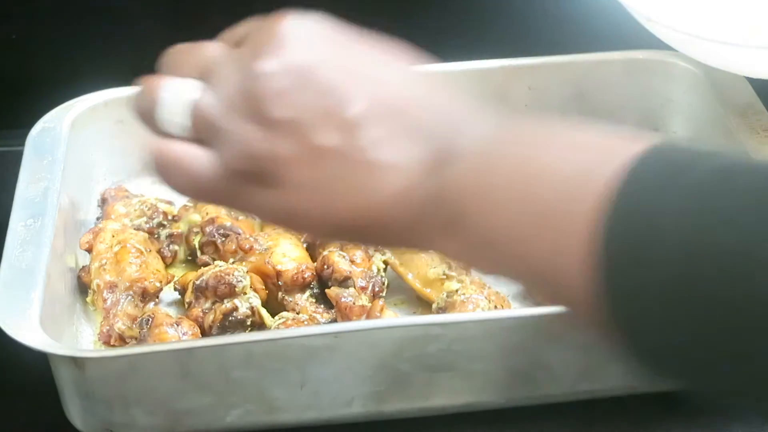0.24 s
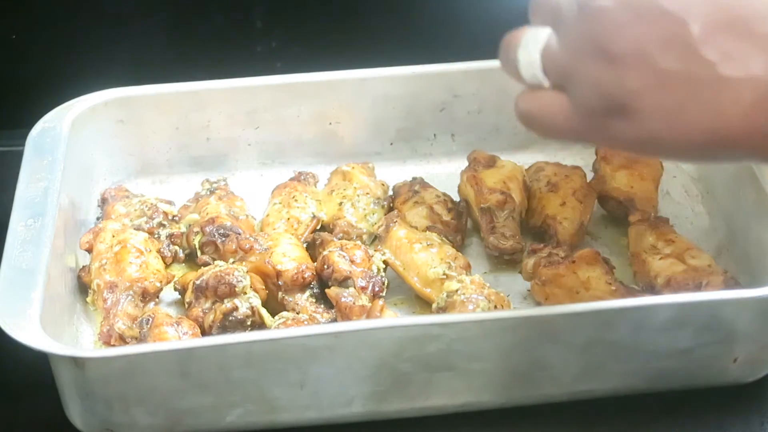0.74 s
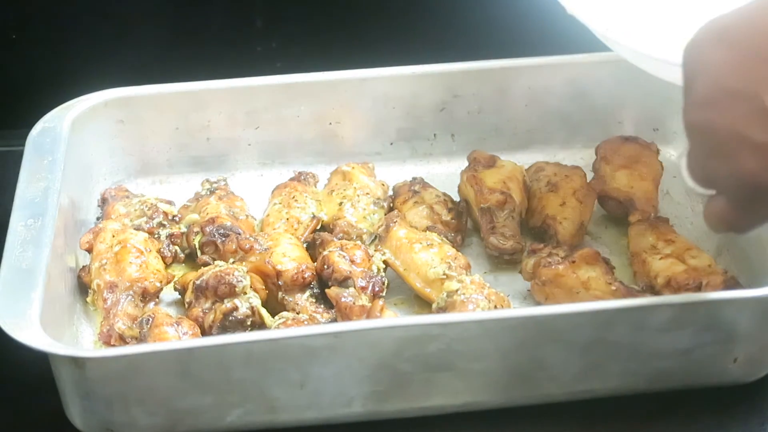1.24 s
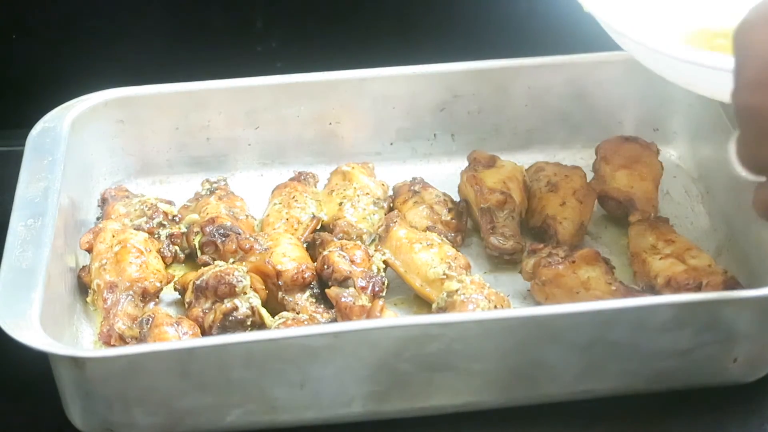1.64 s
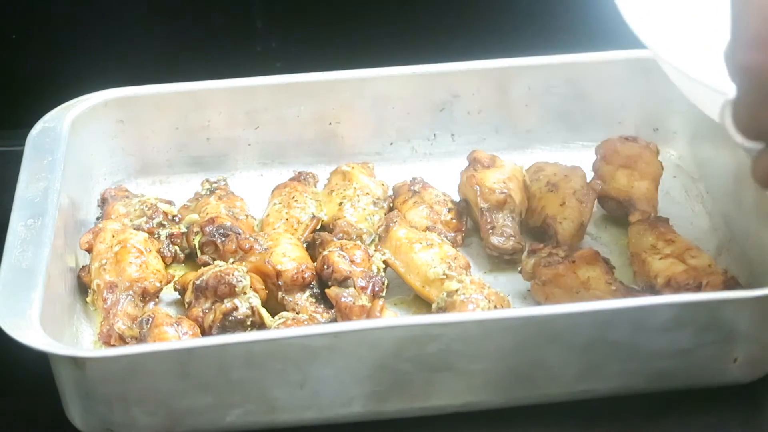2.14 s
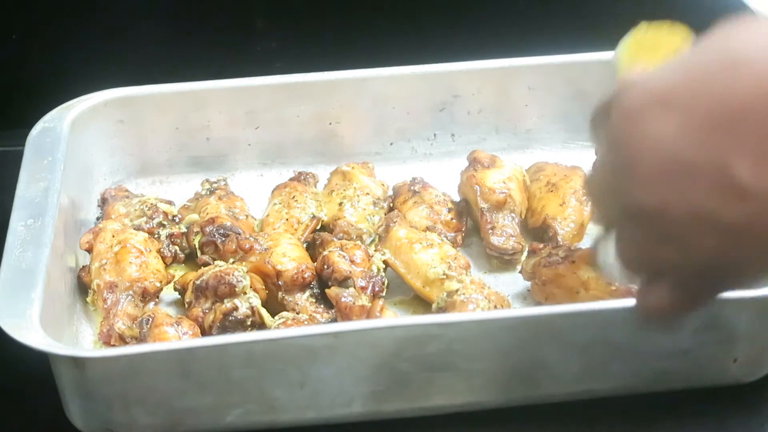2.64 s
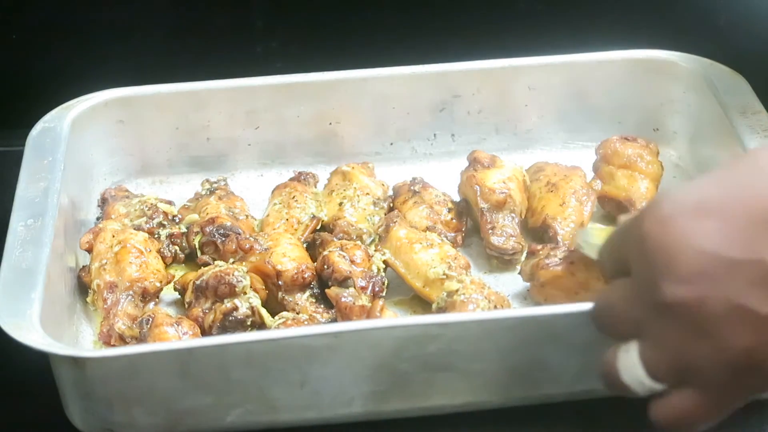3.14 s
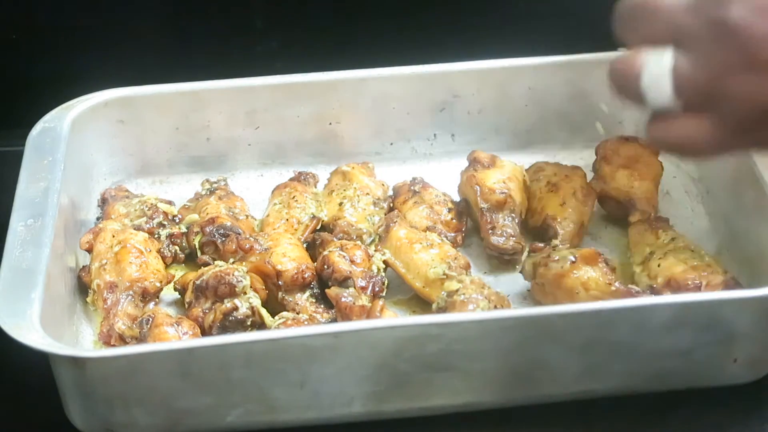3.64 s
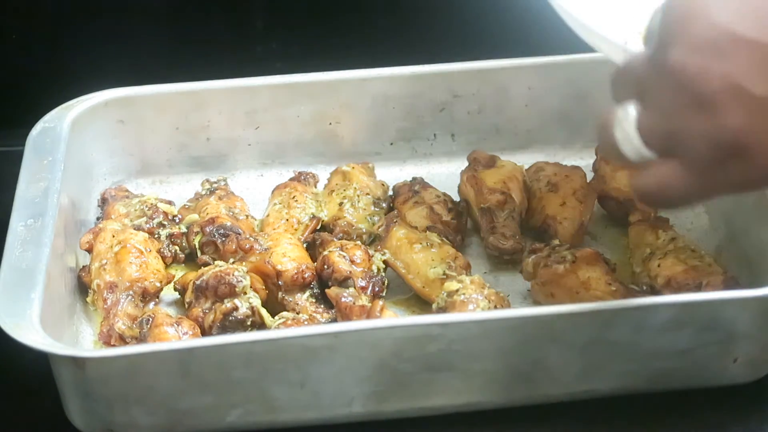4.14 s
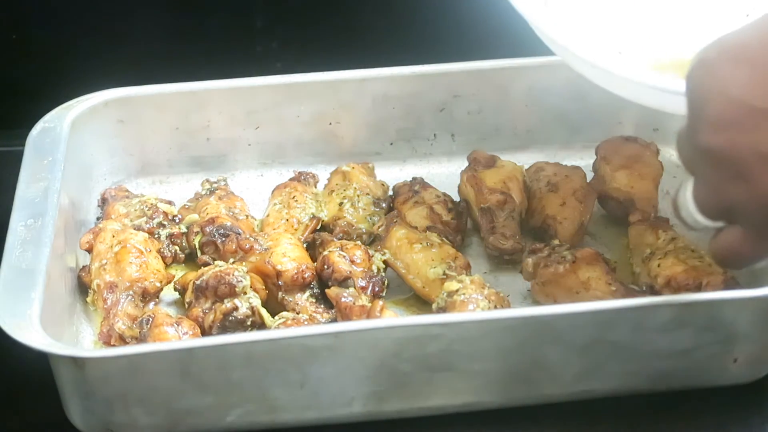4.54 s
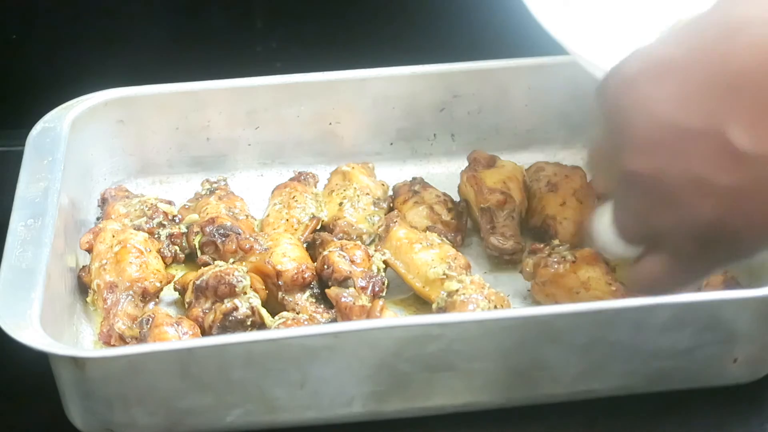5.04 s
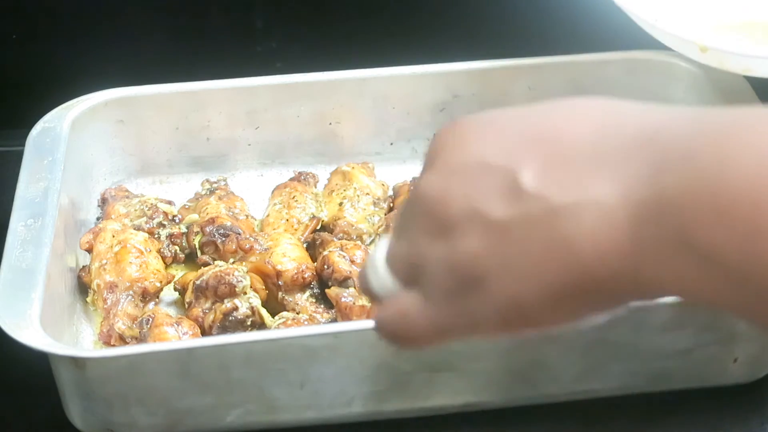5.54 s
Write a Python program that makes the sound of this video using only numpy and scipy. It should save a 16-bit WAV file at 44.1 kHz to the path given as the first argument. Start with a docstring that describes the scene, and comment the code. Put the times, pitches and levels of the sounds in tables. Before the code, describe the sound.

A metal spoon clinks sharply in a sauce bowl, scrapes softly, later strikes a roasting pan once, over a steady low appliance hum.

```python
"""A steel spoon knocks and chatters in a sauce bowl, scoops softly, and once strikes the rim of a roasting pan.
Bowl and pan are damped modes plus a noise crack; scrapes and judder are swarms of clicks; ticks are noise.
The worktop thuds in decaying sines as things shift on it, and a small hard kitchen answers in noise echoes.
Behind it, appliances hum at twice the mains rate with a slow throb, a small motor whines faintly, air moves."""
import sys
import numpy as np
from scipy import signal
from scipy.fft import rfft, irfft, next_fast_len
from scipy.io import wavfile
from scipy.ndimage import map_coordinates

SR = 44100
rng = np.random.default_rng(int(sys.argv[2]) if len(sys.argv) > 2 else 0)


def dump(signal):
    """Clip the signal to [-1, 1] and save it as 16-bit WAV at the path in sys.argv[1]."""
    limited = np.clip(np.atleast_2d(signal).T, -1, 1)
    pcm = np.round(limited * 32767).astype(np.int16)
    wavfile.write(sys.argv[1], SR, pcm)


N = 255780

# the one blow of the spoon on the pan: t/s, level/dB
PAN_BLOW = (5.518, -2.2)


def amp(db):
    """Decibels to gain."""
    return 10 ** (np.asarray(db) / 20)


def unit(x):
    """Scale to rms 1."""
    return x / np.sqrt(np.mean(x ** 2) + 1e-20)


def seconds(size):
    """A time axis in seconds."""
    return np.arange(size) / SR


def fade(t, t60):
    """Exponential decay by 60 dB in t60 seconds."""
    return np.exp(-np.log(1000) * t / t60)


def onset(t, rise):
    """A soft attack with a time constant of rise seconds."""
    return 1 - np.exp(-t / rise)


def along(points, hz):
    """(Hz, value) points read on a log frequency axis."""
    f, v = np.transpose(points)
    return np.interp(np.log(hz + 1), np.log(f), v)


def filtered(x, response):
    """x shaped by a gain that depends on frequency."""
    size = x.shape[-1]
    padded = next_fast_len(size + 8192)
    spectrum = rfft(x, padded) * response(np.fft.rfftfreq(padded, 1 / SR))
    return irfft(spectrum, padded)[..., :size]


def noise(response, size):
    """Coloured noise of rms 1."""
    return unit(filtered(rng.standard_normal(size), response))


def hump(hz, centre, octaves):
    """A broad resonance with gentle skirts."""
    distance = np.log2((hz + 1) / centre) / octaves
    return 1 / (1 + distance ** 2 / 4) ** 4


def wobble(rate):
    """A smooth random curve with rate knots a second."""
    knots = rng.standard_normal(int(N * rate / SR) + 4)
    return map_coordinates(knots, [seconds(N) * rate])


def tone(hz):
    """A sine of rms 1 from a random phase; hz may be a curve."""
    cycles = np.cumsum(hz * np.ones(N)) / SR
    return np.sqrt(2) * np.sin(2 * np.pi * (cycles + rng.random()))


def slips(rate, size, scatter_db=4):
    """A random swarm of tiny clicks, rate of them a second on average, rms 1."""
    strength = amp(rng.normal(0, scatter_db, size))
    polarity = rng.choice([-1, 1], size)
    return unit(strength * polarity * (rng.random(size) < rate / SR))


def stroke(t, length):
    """The rise and fall of one movement of the hand, strongest a third of the way through length."""
    u = 3 * t / length
    return u ** 2 * np.exp(2 * (1 - u))


def add(track, s, sound):
    """Mix a sound into a track from time s on."""
    part = track[..., round(s * SR):][..., :sound.shape[-1]]
    part += sound[..., :part.shape[-1]]


def in_kitchen(sound, near_db, far_db, near_t60=0.18):
    """Direct sound, quick echoes from pan and worktop, then a room tail that decays at its own rate per band."""
    # room decay: f/Hz, t60/s
    room_t60 = [(150, .35), (600, 0.46), (2000, 0.41), (4000, 0.51), (8000, 0.7), (14000, 0.61)]
    # stereo width of the echoes: f/Hz, side minus mid/dB
    echo_width = [(100, -17), (250, -21), (600, -14.5), (1500, -15), (2800, -17.5), (4500, -3), (6500, 0.5),
                  (9000, 8.5), (12000, 2)]
    t = seconds(SR * 3 // 4)
    hz, frames, grains = signal.stft(rng.standard_normal((2, len(t))), SR, nperseg=256)
    decaying = grains * fade(frames, along(room_t60, hz)[:, None])
    far = signal.istft(decaying, SR, nperseg=256)[1][:, :len(t)]
    far = far * onset(t, 0.0097)
    near = rng.standard_normal((2, len(t))) * fade(t, near_t60) * onset(t, 0.0033)
    answer = amp(near_db) * near / np.linalg.norm(near[0]) + amp(far_db) * far / np.linalg.norm(far[0])
    mid, side = signal.fftconvolve(sound[None], answer, axes=1)
    mid[:len(sound)] += sound
    side = filtered(side, lambda hz: amp(along(echo_width, hz)))
    return np.array([mid + side, mid - side])


def ring(modes, t, weight, scatter_db=2.0):
    """Damped modes of a struck body, each a little different in level at every blow."""
    hz, db, t60 = np.transpose(modes)
    size = amp(db) / np.linalg.norm(amp(db)) * weight(hz)
    size = size * amp(rng.normal(0, scatter_db, len(hz)))
    polarity = (-1) ** np.arange(len(hz))
    return (size * polarity) @ (fade(t, t60[:, None]) * np.sin(2 * np.pi * np.outer(hz, t)))


def appliance_hum():
    """A motor slipping against the mains makes the double-mains hum swell and sink over steady low tones."""
    # steady motor tones: f/Hz, level/dB rms
    motor_tones = [(31, -64), (49.57, -49), (59.27, -56), (111.55, -60), (145, -64), (169.6, -64),
                   (240, -69)]
    double_mains_hz, throb_hz = 119.96, 6.19
    throb_depth, throb_peak_s = 0.35, 0.077
    throb = 1 + throb_depth * np.cos(2 * np.pi * throb_hz * (seconds(N) - throb_peak_s))
    hum = amp(-42) * tone(double_mains_hz) * throb
    return hum + sum(amp(db) * tone(hz) for hz, db in motor_tones)


def motor_whine():
    """Thin high tones of a small motor, each wavering in level and pitch on its own."""
    # whine tones: f/Hz, level before wavering/dB rms, pitch wander/Hz
    whine_tones = [(634, -75.5, 6), (1285, -73, 7.7), (1910, -80.5, 13), (2570, -74, 6.4),
                   (3240, -80.5, 3.7), (5100, -84.5, 7), (6438, -91.5, 6), (7084, -81.5, 2)]
    waver_db = 2.05
    whine = np.zeros(N)
    for hz, db, wander in whine_tones:
        level = amp(db + waver_db * wobble(4.4))
        whine += level * tone(hz + wander * wobble(40))
    return whine


def moving_air():
    """Fan air and rumble: steady coloured noise, nearly mono in the deep bass."""
    # colour of the air: f/Hz, level/dB
    air_colour = [(20, -11), (40, 2), (55, 2), (78, -7.5), (95, 4), (130, 3), (170, -3.5), (240, -7),
                  (370, -7), (550, -15), (1500, -22.5), (3300, -28), (7000, -37.5), (12500, -46.5),
                  (15000, -49)]
    # stereo width of the air: f/Hz, side minus mid/dB
    air_width = [(50, -33), (100, -20.5), (160, -4), (240, 1.5), (400, 4), (900, 4), (1500, 2.5), (3000, 0),
                 (12000, 1.5)]
    mid, side = amp(-49) * noise(lambda hz: amp(along(air_colour, hz)), (2, N))
    side = filtered(side, lambda hz: amp(along(air_width, hz)))
    return np.array([mid + side, mid - side])


def crackle():
    """Sparse wet ticks and a faint thin ring of narrow noise while the spoon travels back to the bowl."""
    # the thin ring before the first clink: t/s, level/dB, length/s, f/Hz, width/octaves
    faint_ring = (0.2, -67.5, 0.8, 1886, 0.3)
    ticks_per_s, end_s = 38, 0.8
    out, t = np.zeros((2, N)), seconds(SR)
    clicks = slips(ticks_per_s, len(t), scatter_db=6.5)
    wet = unit(filtered(clicks, lambda hz: hump(hz, centre=3650, octaves=0.39)))
    add(out, 0, in_kitchen(amp(-68) * wet * (t < end_s), near_db=-6, far_db=-24, near_t60=.04))
    s, db, length, centre_hz, octaves = faint_ring
    thin = amp(db) * stroke(t, length) * noise(lambda hz: hump(hz, centre_hz, octaves), len(t))
    add(out, s, in_kitchen(thin, near_db=-.5, far_db=-15.5))
    return out


def contact_sound(place, size, rim_db):
    """One touch of the spoon: the bowl rings briefly, and its rim tone swells just after the contact."""
    # modes of the bowl: f/Hz, level/dB, t60/s
    bowl_modes = [(401, -23.5, 0.2), (566, -7.5, 0.033), (660.7, -1, 0.079), (699.6, -8, .18),
                  (875, -16, 0.12), (1045, -15, 0.095), (1350, -6.5, 0.063), (1427, -14.5, 0.1),
                  (1586, -17.5, 0.035), (1866, -9, 0.08), (1890, -29.5, 0.77), (2360, -14.5, 0.098),
                  (2613, -3, 0.036), (2935, -3, 0.031), (3270, -6.5, 0.026), (3465, -12, 0.07),
                  (3740, -1.5, 0.014), (4470, -18.5, 0.037), (4850, -25.5, 0.0398)]
    # colour of the contact crack: f/Hz, level/dB
    crack_colour = [(100, -47.5), (250, -18), (480, 5.5), (850, -2), (1500, 2), (3000, 5), (4000, -1),
                    (5500, -10.5), (8000, -22), (10000, -23.5), (12000, -21.5), (15000, -33)]
    t, place = seconds(size), np.clip(place, 0, 1)
    # belly blows (place 0) bring out the low modes, those near the rim (1) the bright ones
    body_db = 13 - 22.5 * place
    edge_db = -2.5 + 9.5 * place
    edge_hz, soft_hz = 3700, 3900

    def contact(hz):
        """Tilt by place; sauce softens every contact."""
        tilt_db = body_db / (1 + (hz / 900) ** 6) + edge_db * hump(hz, edge_hz, 0.68)
        return amp(tilt_db) / np.sqrt(1 + (hz / soft_hz) ** 4)

    crack = filtered(noise(lambda hz: amp(along(crack_colour, hz)), len(t)), contact) * fade(t, 0.052)
    blow = (amp(-3) * ring(bowl_modes, t, contact) + amp(-6) * crack) * onset(t, 0.00023)
    # the rim tone grows and climbs in pitch with the place
    rim_hz = 1857 + 160 * place
    rim_peak_s, rim_spread_s = 0.01, 0.0032
    swell = np.exp(-((t - rim_peak_s) / rim_spread_s) ** 2 / 2)
    return blow + amp(rim_db) * place * swell * np.sin(2 * np.pi * rim_hz * t)


def bowl():
    """The spoon knocks on the hand-held bowl, each blow coloured by where it lands."""
    # knocks: t/s, level/dB, place on the wall (0 belly - 1 rim)
    knocks = [(0.8716, -12, .1), (0.8775, -20, .95), (0.8918, -10, 0.39), (0.9065, -22.5, 0.99),
              (0.9474, -6.5, 0.76), (0.9705, -16, 0.38), (1.154, -35, 0.82), (4.044, -40, 0.16),
              (4.0648, -35, 0.94), (4.0915, -5, 0.43), (4.1957, -13.5, 0.89), (4.365, -37, 0.73),
              (4.525, -47, 0.66)]
    out = np.zeros((2, N))
    for s, db, place in knocks:
        knock = amp(db) * contact_sound(place, size=SR * 2 // 5, rim_db=-1)
        add(out, s, in_kitchen(knock, near_db=-7.5, far_db=-15.5))
    return out


def chatter():
    """Quick, uneven touches that tend to grow lighter as the spoon rubs against the bowl after a clink."""
    # chatters: t/s, starting level/dB, length/s
    chatters = [(1.0, -33.5, .36), (4.26, -40, .24)]
    touches_per_s, fall_db_per_s, scatter_db = 50, 54, 4
    out = np.zeros((2, N))
    for s, db, length in chatters:
        touches = np.zeros(SR * 3 // 4)
        for beat in np.arange(0, length, 1 / touches_per_s):
            at = beat + rng.random() / touches_per_s
            strength = amp(db - fall_db_per_s * at + rng.normal(0, scatter_db))
            place = rng.normal(0.75, 0.11)
            # light touches near the rim barely raise its tone
            add(touches, at, strength * contact_sound(place, size=SR // 8, rim_db=-6.5))
        add(out, s, in_kitchen(touches, near_db=-5, far_db=-21.5))
    return out


def scrapes():
    """The spoon drags through sauce and along the sides: swarms of tiny slips under a short stroke."""
    # strokes: t/s, level/dB, length/s, centre f/Hz
    strokes = [(1.015, -44, 0.13, 3230), (1.793, -51, 0.032, 2940), (1.978, -43, 0.026, 1250),
               (2.047, -39.5, .058, 2030), (2.269, -46, 0.037, 2900), (2.486, -60, 0.035, 3880),
               (2.711, -46.5, .026, 2170), (2.787, -49.5, .023, 2260), (4.742, -51, 0.071, 2030),
               (5.186, -56.5, 0.17, 2740), (5.753, -56, .045, 2360)]
    # broad colour under the resonance: f/Hz, level/dB
    bed_colour = [(150, -15), (350, 10), (800, 15), (2500, 2), (6000, -9.5), (9000, -18), (12000, -13),
                  (15000, -19)]
    slips_per_s, smooth, bed_db = 520, 0.89, -17
    out, t = np.zeros((2, N)), seconds(SR // 2)
    for s, db, length, centre_hz in strokes:
        grit = slips(slips_per_s, len(t)) + smooth * rng.standard_normal(len(t))
        octaves = 0.76 * 2010 / centre_hz  # higher strokes are narrower
        colour = lambda hz: hump(hz, centre_hz, octaves) + amp(bed_db + along(bed_colour, hz))
        scrape = amp(db) * stroke(t, length) * unit(filtered(grit, colour))
        add(out, s, in_kitchen(scrape, near_db=-1.0, far_db=-5))
    return out


def worktop():
    """Each soft bump sets the worktop booming in one low, decaying sine."""
    # bumps: t/s, level/dB, f/Hz, t60/s
    bumps = [(1.986, -36.5, 182, 0.22), (2.055, -35, 94, .15), (2.269, -25, 99, 0.19), (2.31, -39, 92, .2),
             (2.361, -29.5, 92, 0.13), (3.332, -33, 187, 0.079)]
    out, t = np.zeros(N), seconds(SR // 2)
    for s, db, hz, t60 in bumps:
        boom = np.sin(2 * np.pi * hz * t) * fade(t, t60) * onset(t, 0.0017)
        add(out, s, amp(db) * boom)
    return out


def light_ticks():
    """Light taps and wet ticks: single bursts of band-shaped noise."""
    # taps: t/s, level/dB, t60/s, centre f/Hz, width/octaves
    taps = [(3.111, -41, 0.034, 10400, 1), (3.333, -32.5, 0.061, 1870, 0.75),
            (3.832, -36.5, 0.05, 2120, 0.23)]
    out, t = np.zeros((2, N)), seconds(SR // 2)
    for s, db, t60, centre_hz, octaves in taps:
        burst = noise(lambda hz: hump(hz, centre_hz, octaves), len(t)) * fade(t, t60) * onset(t, 0.0014)
        add(out, s, in_kitchen(amp(db) * burst, near_db=-9.5, far_db=-31))
    return out


def pan():
    """One hard clack on the pan, whose load of meat damps its modes at once."""
    # modes of the loaded pan: f/Hz, level/dB, t60/s
    pan_modes = [(280.5, -28, 0.14), (415, -10.5, 0.06), (808, 4.5, 0.022), (939, 3, 0.027),
                 (1283, -13.5, 0.12), (1580, -13, 0.043), (1835, -15, 0.15), (2190, -5.5, 0.059),
                 (2336, -11, 0.066), (2610, -9.5, 0.06), (3164, -11, 0.058), (3520, -29, 0.032),
                 (4270, -12, 0.01), (5780, -25, 0.04), (7520, -30, 0.023), (11890, -20, 0.0127)]
    # colour of the contact crack: f/Hz, level/dB
    crack_colour = [(100, -20), (300, -1), (900, -5), (2500, 0), (4200, 1), (5000, -12), (7500, -17),
                    (9500, -29), (12000, -12.5), (15000, -27)]
    out, t = np.zeros((2, N)), seconds(SR // 4)
    s, db = PAN_BLOW
    crack = amp(-7) * noise(lambda hz: amp(along(crack_colour, hz)), len(t)) * fade(t, 0.029)
    clack = (ring(pan_modes, t, np.ones_like) + crack) * onset(t, 0.0002)
    add(out, s, in_kitchen(amp(db) * clack, near_db=-8.5, far_db=-40))
    return out


def judder():
    """Just after the hit the spoon buzzes on the pan in a swarm of tiny contacts, then lifts off."""
    # colour of the buzz: f/Hz, level/dB
    buzz_colour = [(200, -18.5), (750, -11), (1260, -0.5), (1650, -9.5), (1950, -3), (2500, -10),
                   (3000, -17.5), (4200, -16), (5000, -28), (11400, -44), (15000, -56)]
    contacts_per_s, smooth = 1500, 0.48
    delay_s, hold_s, release_t60, sag_db_per_s = .025, 0.088, 0.22, 59
    out, t = np.zeros((2, N)), seconds(SR // 2)
    release = fade(np.maximum(t - hold_s, 0), release_t60)
    level = onset(t, .004) * amp(-32.5 - sag_db_per_s * t) * release
    grit = slips(contacts_per_s, len(t)) + smooth * rng.standard_normal(len(t))
    buzz = level * unit(filtered(grit, lambda hz: amp(along(buzz_colour, hz))))
    add(out, PAN_BLOW[0] + delay_s, in_kitchen(buzz, near_db=-5.5, far_db=-26))
    return out


def scene():
    """Everything in the kitchen: the background, then the spoon's sounds and the worktop."""
    background = appliance_hum() + motor_whine() + moving_air()
    in_bowl = crackle() + bowl() + chatter() + scrapes() + light_ticks()
    on_pan = pan() + judder()
    return background + in_bowl + worktop() + on_pan


def record(dry):
    """The microphone rounds off the highest peaks, dulls the top treble and passes nothing from 16 kHz up."""
    # treble roll-off: f/Hz, level/dB
    roll_off = [(12300, 0), (13200, -12), (14500, -7), (16000, -16.5)]
    top_hz = 16000
    rounded = dry / (1 + np.abs(dry / .95) ** 8) ** (1 / 8)
    return filtered(rounded, lambda hz: amp(along(roll_off, hz)) * (hz < top_hz))


dry = scene()
out = record(dry)
dump(out)
```